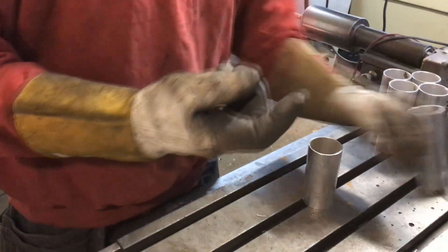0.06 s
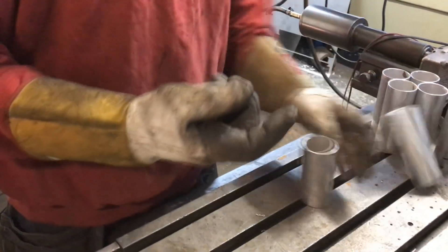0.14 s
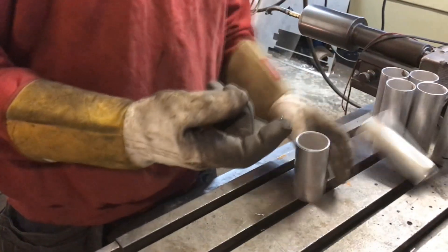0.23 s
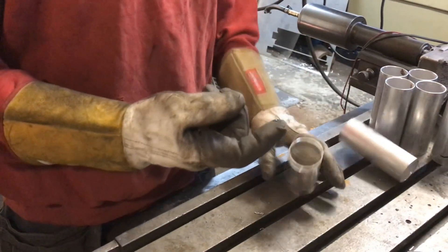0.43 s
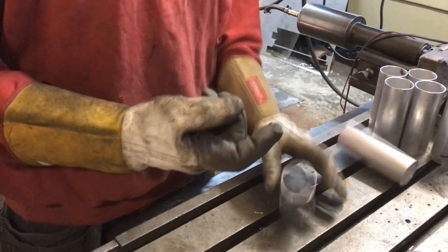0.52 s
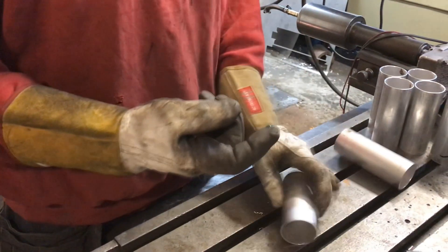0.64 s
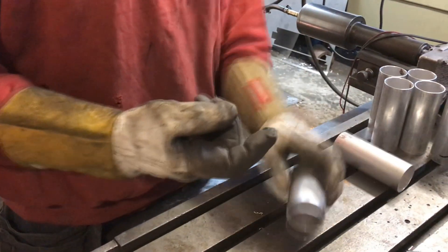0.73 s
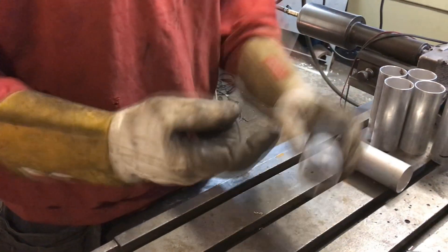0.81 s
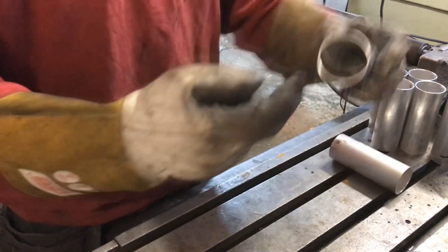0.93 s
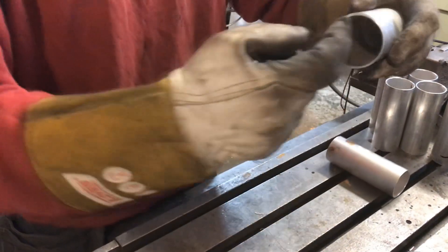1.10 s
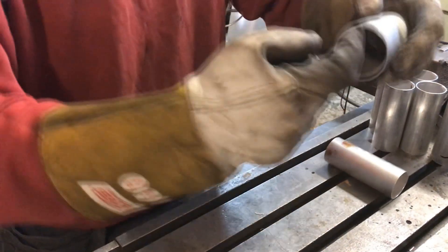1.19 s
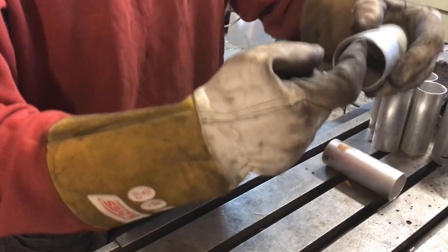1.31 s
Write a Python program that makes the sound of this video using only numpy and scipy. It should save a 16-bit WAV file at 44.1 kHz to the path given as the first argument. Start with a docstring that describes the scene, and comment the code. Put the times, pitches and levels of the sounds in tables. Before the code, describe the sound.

Short aluminium tubes clink, scrape and ring brightly against a steel table in a workshop

```python
"""A leather glove brushes a short aluminium tube over a soft low bump; then the tube clinks on a steel table.
Blows excite damped modes, rubbing sustains the low ones, and the rim sings, hisses, squeaks and buzzes.
A second tube drops on its side and bounces; contacts knock, crack and tick as filtered noise and set off
short rings. Light glove touches end the held tube's ring, among workshop reflections and a low rumble.
"""
import sys
import numpy as np
from scipy import signal
from scipy.io import wavfile

SR = 44100
rng = np.random.default_rng(int(sys.argv[2]) if len(sys.argv) > 2 else 0)


def to_wav(sig):
    """Store sig (one row per channel, or 1-D mono) as 16-bit WAV at the path in sys.argv[1].

    Samples outside -1..1 are clipped; the rate is SR.
    """
    pcm = np.clip(np.atleast_2d(sig), -1, 1) * 32767
    pcm = np.round(pcm).astype(np.int16)
    wavfile.write(sys.argv[1], SR, pcm.T)  # frames by channels


N = 59535
T = np.arange(N) / SR  # time axis, s

# Ringing modes, with a close neighbour tone (the first) that makes the low ring flutter: [f/Hz]
RING_HZ = [2237, 2277, 2397, 5690, 6395, 6545, 7585, 10240, 10345, 11162, 11519, 12139, 12269, 12990, 13230,
           14364, 14719]
# Their relative strength: [level/dB]
RING_DB = [-9, -1, -5.5, -1.5, -1, -1, -5, -21, -20.5, -14, -18, -11, -8, -20, -19.5, -7, -10]
# Their basic ring time against frequency: [f/Hz, t60/s]
RING_T60 = [(2300, 0.26), (6000, 0.14), (7600, 0.17), (11200, 0.26), (14500, 0.066)]
# Held tube's blows: [t/s, low ring level/dB, middle ring level/dB, its lean/(dB per octave),
# top ring level/dB, its lean/(dB per octave), table knock level/dB, crack level/dB, ring length factor]
CLINKS = [(0.09, -59, -58.5, -26, -53, -2, -42.5, -95, 2.1),
          (0.097, -37, -63, -9, -59.5, 2, -33.5, -78, 1.04),
          (0.12, -32.5, -46.5, -8, -45, -14, -32, -80, 0.78),
          (0.2158, -22.5, -22, -25.5, -20.5, 0, -13, -21.5, 0.55),
          (0.3055, -19.5, -11.5, -2.5, -16, 3.5, -26.5, -11, 1.09),
          (0.319, -13.5, -16, -34.5, -18, 2.5, -25, -24, 0.56),
          (0.4622, -15, -12, 32.5, -10, -6, -20.5, -10, 0.69),
          (0.5789, -46, -14.5, -7.5, -17.5, 38.5, -27, -10.5, 0.95),
          (0.6706, -23, -20.5, -14.5, -20.5, 4, -28.5, -20.5, 0.49),
          (0.734, -35.5, -24.5, -3, -31, -9, -31.5, -36, 0.62),
          (.779, -26, -28.5, -10, -36.5, -17, -36.5, -36, 0.88),
          (0.825, -29.5, -40.5, 25.5, -37, 4, -57, -68, 0.23)]
# Second tube's landing and bounce: [t/s, ring level/dB, ring tilt/(dB per octave),
# table knock level/dB, crack level/dB]
DROPS = [(.619, -9, -1, -22, -15), (0.6394, -25, 3.5, -31, -17.5)]
MIDDLE_FROM_HZ, TOP_FROM_HZ = 4000, 9000  # limits between low, middle and top modes


def amp(db):
    """Level definition: decibels to amplitude gain."""
    return 10 ** (np.asarray(db) / 20)


def unit(x):
    """Normalisation by mean power: scales to rms 1."""
    return x / np.sqrt(np.mean(abs(x) ** 2) + 1e-20)


def read(points, hz):
    """Logarithmic frequency scale: interpolates a curve over log frequency."""
    f, value = np.transpose(points)
    return np.interp(np.log(hz + 1), np.log(f + 1), value)


def level(points):
    """Amplitude envelope: gain over time from a curve that is linear in dB."""
    return amp(np.interp(T, *np.transpose(points)))


def decay(start, t60):
    """Exponential damping: jumps to 1 at start and falls 60 dB in t60 seconds."""
    return (T >= start) * np.exp(-np.log(1000) * np.maximum(T - start, 0) / t60)


def rise(envelope):
    """Finite contact time: a one-pole smoother rounds off each onset."""
    rise_s = .0005
    r = np.exp(-1 / (rise_s * SR))
    return signal.lfilter([1 - r], [1, -r], envelope)


def colour(x, points, size=4096):
    """Minimum-phase filtering: a causal response of unit energy with the given spectral shape."""
    log_gain = np.log(amp(read(points, abs(np.fft.fftfreq(size, 1 / SR)))))
    spectrum = np.exp(np.conj(signal.hilbert(log_gain)))
    taps = np.fft.ifft(spectrum).real[:size // 2]
    return signal.fftconvolve(x, taps / np.linalg.norm(taps))[:N]


def wander(hz):
    """Band-limited random process: complex drift of rms 1 with a Gaussian spectrum of width hz."""
    noise = rng.standard_normal(N) + 1j * rng.standard_normal(N)
    return unit(np.fft.ifft(noise * np.exp(-(np.fft.fftfreq(N, 1 / SR) / hz) ** 2)))


def tone(hz, depth=1):
    """Randomly modulated oscillator: one tone fluttering in level and phase; hz may be a curve."""
    slow = .45 * wander(28)  # depth, width in Hz
    fast = .2 * wander(170)
    flutter = 1 + depth * (slow + fast)
    cycles = np.cumsum(hz * np.ones(N)) / SR + rng.random()
    return unit((flutter * np.exp(2j * np.pi * cycles)).real)


def held_tube():
    """Modal superposition: blows add energy, the grip damps it, and rubbing sustains a beating low pair."""
    # Rim rubbing: [t/s, sustained low ring level/dB]
    singing = [(.175, -66), (.2, -31.5), (.26, -29.5), (.3, -29.5), (.45, -32), (.48, -29.5), (.52, -16),
               (.573, -16), (.61, -25), (.66, -37.5), (.715, -22.5), (.745, -33.5), (.845, -33),
               (.865, -53), (.915, -33.5), (.945, -67), (.97, -45), (1.005, -54.5), (1.03, -42),
               (1.06, -50.5), (1.1, -63.5), (1.12, -48), (1.19, -70.5)]
    # Low ring's bend as the grip and the contact shift: [t/s, frequency shift f/Hz]
    bend_curve = [(.25, 0), (.34, 10), (.43, -8), (.58, 1), (.66, -10), (.75, 5)]
    # Fingertip ticks on the lifted tube: [t/s, middle ring level/dB, top ring level/dB]
    touches = [(1.132, -51, -47), (1.181, -71.5, -55.5), (1.231, -59.5, -55), (1.266, -59.5, -57)]
    touch_length = 0.44  # ring length factor
    beat_db = -13  # upper mode of the rubbed pair, relative to the lower
    middle_pivot_hz, top_pivot_hz = 6770, 12470  # where a lean changes nothing
    sing_flutter = .42  # rubbing steadies the pair

    out = np.zeros(N)
    bend = np.interp(T, *np.transpose(bend_curve))
    rubbed = {RING_HZ[1]: level(singing), RING_HZ[2]: amp(beat_db) * level(singing)}
    for hz, db in zip(RING_HZ, RING_DB):
        is_low, is_top = hz < MIDDLE_FROM_HZ, hz > TOP_FROM_HZ
        t60 = read(RING_T60, hz)
        octaves = np.log2(hz / (top_pivot_hz if is_top else middle_pivot_hz))
        # no rubbing before the first blow
        energy = np.zeros(N) + (rubbed.get(hz, 0) * (T > CLINKS[0][0])) ** 2
        for s, low, middle, middle_lean, top, top_lean, _, _, length in CLINKS:
            if is_low:
                blow_db = low
            elif is_top:
                blow_db = top + top_lean * octaves
            else:
                blow_db = middle + middle_lean * octaves
            energy += (amp(db + blow_db) * decay(s, t60 * length)) ** 2
        if not is_low:
            for s, middle, top in touches:
                touch_db = top if is_top else middle
                energy += (amp(db + touch_db) * decay(s, t60 * touch_length)) ** 2
        depth = sing_flutter if hz in rubbed else 1
        out += rise(np.sqrt(energy)) * tone(hz + is_low * bend, depth)
    return out


def contacts():
    """Impact excitation: blows knock, crack, chatter and set off short rings, among short dull ticks."""
    # Dull part of a blow: [f/Hz, spectral level/dB]
    knock_shape = [(160, -40), (240, -8.5), (450, -11), (750, 1), (1000, 4), (1450, 5), (1900, -5.5),
                   (3000, -9), (6000, -33.5), (16000, -49.5)]
    # Sharp part of a blow of the held tube: [f/Hz, spectral level/dB]
    crack_shape = [(100, -54), (1500, -11.5), (3200, -10.5), (4400, 2.5), (5300, -3.5), (7000, -5),
                   (8600, -3), (10000, -10.5), (14500, -20.5), (16000, -28.5)]
    # Sharp part of the second tube's flat landing: [f/Hz, spectral level/dB]
    clack_shape = [(100, -51), (400, -18.5), (1500, -1.5), (3200, -5.5), (4500, -4), (6000, -13.5),
                   (8400, -5), (10500, -14), (14500, -9), (16000, -19)]
    # Colour of a tick: [f/Hz, spectral level/dB]
    tick_shape = [(100, -45), (2300, -12), (3100, 8), (3700, 0), (4600, -13), (12000, -24)]
    # Short dull ticks around 3 kHz, some belonging to blows: [t/s, level/dB]
    ticks = [(.204, -39), (.215, -23), (0.292, -38), (.339, -21), (0.357, -22), (0.379, -29), (0.392, -32)]
    # Short rings after blows, two of the table and one high overtone of the tubes: [f/Hz, level/dB, t60/s]
    short_rings = [(258, -29, .13), (1400, -24, .08), (4510, -23, .11)]
    knock_t60, crack_t60, tick_t60 = .026, .016, .011  # s
    chatter_db, chatter_t60 = -17, .085  # relative to the crack; s

    def snap(s, db):
        """Two-stage decay: a crack followed by weaker, longer chatter."""
        return amp(db) * (decay(s, crack_t60) + amp(chatter_db) * decay(s, chatter_t60))

    dull_blows = [(row[0], row[6]) for row in CLINKS] + [(row[0], row[3]) for row in DROPS]
    sharp_blows = [(row[0], row[7]) for row in CLINKS] + [(row[0], row[4]) for row in DROPS]

    rings = np.zeros(N)
    for hz, ring_db, t60 in short_rings:
        # knock levels drive the table's rings, crack levels the high overtone
        blows = dull_blows if hz < MIDDLE_FROM_HZ else sharp_blows
        rings += tone(hz) * rise(sum(amp(db + ring_db) * decay(s, t60) for s, db in blows))

    knock = sum(amp(db) * decay(s, knock_t60) for s, db in dull_blows)
    crack = sum(snap(row[0], row[7]) for row in CLINKS)
    clack = sum(snap(row[0], row[4]) for row in DROPS)
    tick = sum(amp(db) * decay(s, tick_t60) for s, db in ticks)
    parts = [(knock, knock_shape), (crack, crack_shape), (clack, clack_shape), (tick, tick_shape)]
    # noise of random sign carries each envelope
    return rings + sum(colour(push * rng.choice([-1., 1.], N), shape) for push, shape in parts)


def loose_tube():
    """Damped free vibration: the second tube lands and bounces, its ring damped by the table."""
    # Second tube's modes: [f/Hz]
    loose_hz = [2261, 2455, 4527, 6492, 6634, 7840, 8463]
    # Their strength and damping: [level/dB, t60/s]
    loose_modes = [(-1, 0.068), (-5.5, 0.066), (-17.5, 0.1), (-10.5, 0.044), (-8, 0.087), (-14, 0.09),
                   (-28, 0.09)]
    out = np.zeros(N)
    for hz, (db, t60) in zip(loose_hz, loose_modes):
        octaves = np.log2(hz / loose_hz[0])
        ringing = sum(amp(db + ring + tilt * octaves) * decay(s, t60) for s, ring, tilt, _, _ in DROPS)
        out += tone(hz) * rise(ringing)
    return out


def drag():
    """Friction as random impulses: grit under the sliding rim hisses and stirs the upper modes."""
    # Strength of the dragging: [t/s, level/dB]
    drag_curve = [(.085, -86), (.11, -67), (.165, -86), (.2, -42), (.27, -59), (.33, -23.5), (.39, -46.5),
                  (.44, -53), (.5, -31), (.55, -39.5), (.66, -43), (.81, -53), (.87, -67.5), (1.35, -77)]
    # Colour of the grit: [f/Hz, spectral level/dB]
    grit_shape = [(60, -37.5), (250, -11), (800, -11.5), (1400, -2.5), (2000, -5), (3200, -7.5),
                  (5000, -2.5), (7200, 7), (8800, -23), (12500, -8.5), (14800, -8), (16000, -22.5)]
    grains_per_s, spread_db = 5000, 2  # average rate; scale of the random excess level
    ring_db = 4.5  # gain of the stirred modes
    struck = rng.random(N) < grains_per_s / SR
    excess_db = spread_db * np.minimum(rng.exponential(1, N), 4)
    grains = unit(struck * rng.standard_normal(N) * amp(excess_db))
    push = grains * level(drag_curve)
    ring = sum(amp(db) * decay(0, read(RING_T60, hz)) * np.sin(2 * np.pi * hz * T)
               for hz, db in zip(RING_HZ, RING_DB) if hz > MIDDLE_FROM_HZ)
    stirred = signal.fftconvolve(push, ring / np.linalg.norm(ring))[:N]
    return colour(push, grit_shape) + amp(ring_db) * stirred


def brief_tones():
    """Half-sine enveloped tones: squeaks, buzzing overtones of the singing rim, a soft swell of a tube mode."""
    # Brief tones: [start t/s, length t/s, starting pitch f/Hz, glide/(Hz per s), level/dB]
    tone_rows = [(.172, .042, 8450, -3000, -48), (.174, .042, 12300, 6000, -50), (.382, .04, 5690, 0, -29),
                 (.47, .1, 6963, 0, -34), (.47, .095, 7077, 0, -33), (.808, .034, 7580, 5000, -40)]
    out = np.zeros(N)
    for s, length, hz, glide, db in tone_rows:
        swell = np.sin(np.pi * np.clip((T - s) / length, 0, 1))
        out += amp(db) * swell * tone(hz + glide * (T - s))
    return out


def glove():
    """Broadband friction noise: the leather glove brushes the tube as it takes hold."""
    # Strength of the brushing: [t/s, level/dB]
    brush_curve = [(0, -53.5), (.03, -60), (.05, -68), (.085, -66), (.11, -47), (.16, -54), (.2, -42.5),
                   (.27, -49.5), (.31, -73)]
    # Colour of the leather: [f/Hz, spectral level/dB]
    leather_shape = [(100, -14.5), (300, -9), (700, -1), (1400, -6), (2000, -8.5), (4000, -15.5),
                     (11000, -16.5), (16000, -27)]
    return colour(level(brush_curve) * rng.standard_normal(N), leather_shape)


def workshop(x, size=256):
    """Diffuse reverberation: noise reflections decay at a rate set by frequency, the treble dying first."""
    # Reverberation time: [f/Hz, t60/s]
    room_t60 = [(100, 0.34), (1000, 0.86), (2500, 0.89), (4500, 0.64), (6500, 0.48), (10000, 0.38),
                (16000, 0.23)]
    taps = rng.standard_normal(N) * (T > .004)  # reflections start after 4 ms
    hz, t, z = signal.stft(taps, SR, nperseg=size)
    damping = np.exp(-np.log(1000) * t / read(room_t60, hz)[:, None])
    tail = signal.istft(z * damping, SR, nperseg=size)[1]
    return signal.fftconvolve(x, tail / np.linalg.norm(tail))[:N]


def background():
    """Stationary filtered noise: a low room rumble, with one damped low sine as a soft opening bump."""
    # Colour of the rumble: [f/Hz, spectral level/dB]
    floor_shape = [(20, -20.5), (45, -5.5), (80, 6.5), (130, -4.5), (200, -4), (300, -9), (700, -21.5),
                   (1500, -21), (4000, -30), (16000, -41.5)]
    floor_db = -62.5
    bump_hz, bump_t60, bump_db = 115, .18, -46  # Hz, s, dB
    bump = amp(bump_db) * decay(0, bump_t60) * np.sin(2 * np.pi * bump_hz * T)
    return amp(floor_db) * colour(rng.standard_normal(N), floor_shape) + bump


def scene():
    """Superposition of direct and reflected sound: the wide table sends more into the room than the tubes."""
    ring_room_db, contact_room_db = -16, -10
    ring = held_tube() + loose_tube() + drag() + brief_tones() + glove()
    hits = contacts()
    reflected = workshop(amp(ring_room_db) * ring + amp(contact_room_db) * hits)
    return (ring + hits + reflected + background())[None]


def record(dry):
    """Soft saturation and band limiting: peaks round off at full scale, then a low-pass filter acts."""
    edge_hz = 16000
    held = dry / (1 + dry ** 6) ** (1 / 6)
    low_pass = signal.firwin(255, edge_hz, window=("kaiser", 9), fs=SR)
    return signal.oaconvolve(held, low_pass[None], "same")


dry = scene()
out = record(dry)
to_wav(out)
```